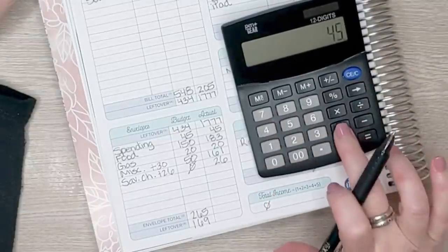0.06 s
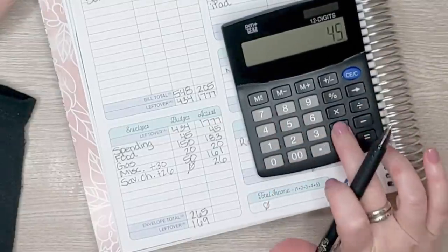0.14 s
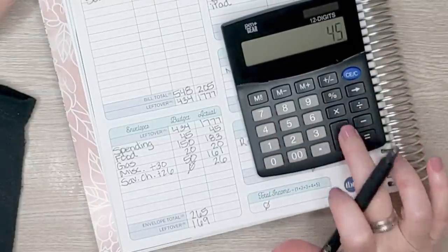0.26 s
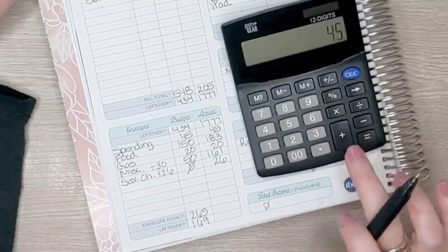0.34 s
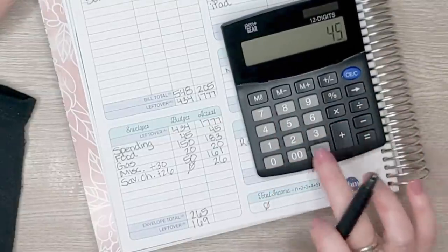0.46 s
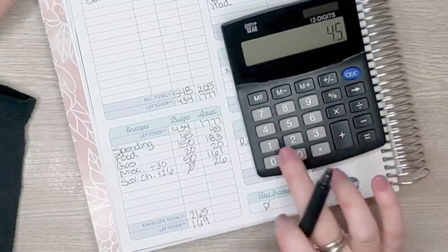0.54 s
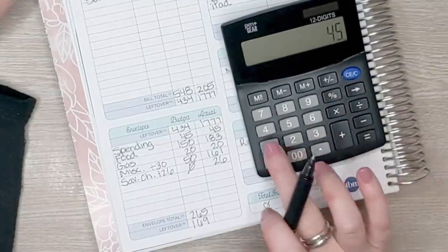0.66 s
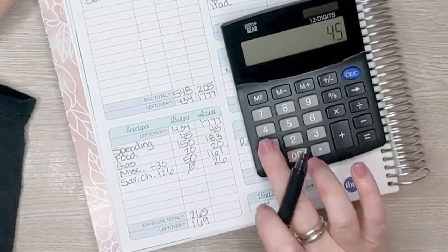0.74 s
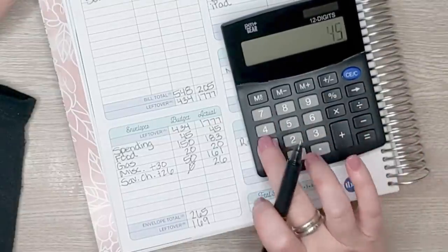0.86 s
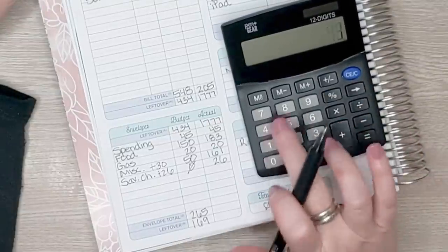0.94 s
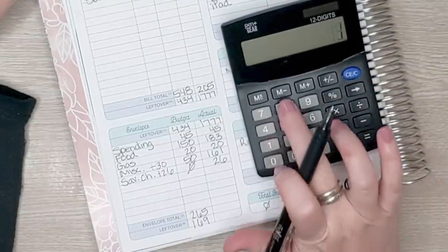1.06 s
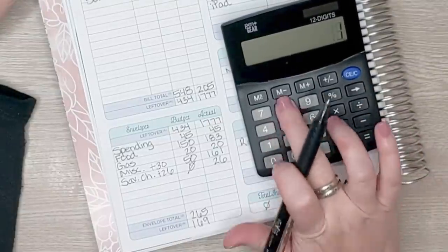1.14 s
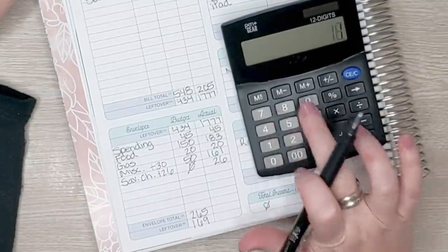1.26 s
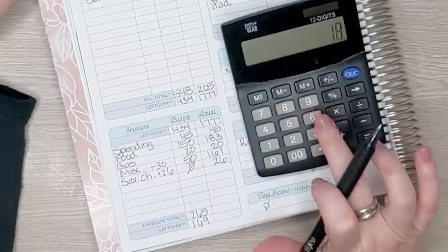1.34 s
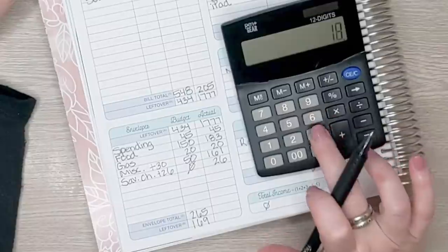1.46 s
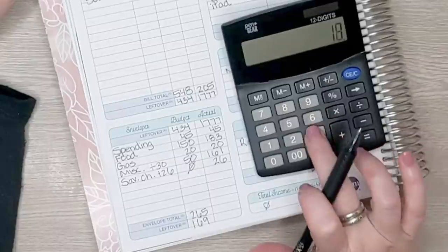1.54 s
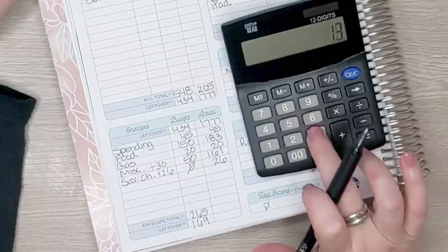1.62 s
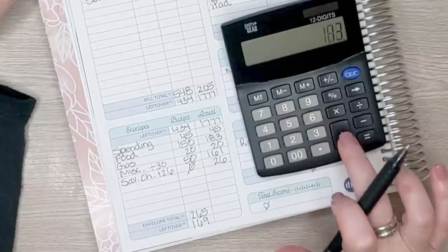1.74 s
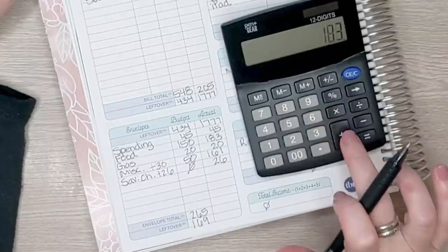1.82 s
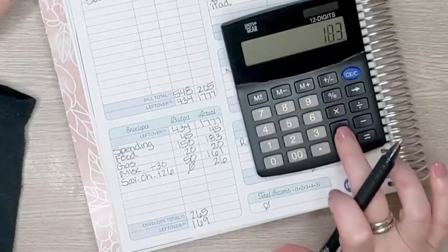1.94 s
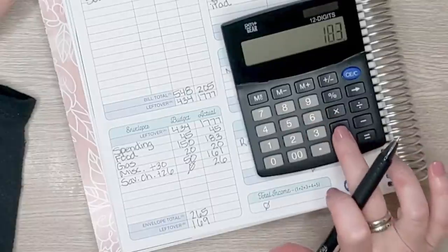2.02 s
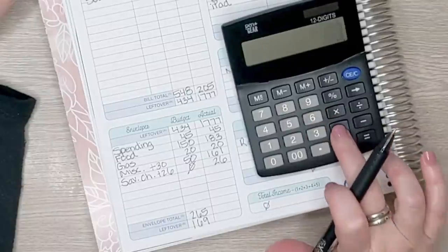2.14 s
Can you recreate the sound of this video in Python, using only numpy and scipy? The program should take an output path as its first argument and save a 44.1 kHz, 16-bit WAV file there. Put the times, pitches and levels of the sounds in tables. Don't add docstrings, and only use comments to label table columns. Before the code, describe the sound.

Calculator key clicks: one sharp loud press, then three softer ones, each with a springy return

```python
import sys
import numpy as np
from scipy import signal
from scipy.fft import rfft, irfft
from scipy.io import wavfile
from scipy.ndimage import uniform_filter1d

SR = 44100
rng = np.random.default_rng(int(sys.argv[2]) if len(sys.argv) > 2 else 0)


def int16_out(signal):
    q = np.round(np.clip(np.atleast_2d(signal).T, -1, 1) * 32767)
    wavfile.write(sys.argv[1], SR, q.astype(np.int16))


def volts_from_decibels(level):
    exponent = np.asarray(level, float) / 20
    return 10 ** exponent


N = 97020

# [f/Hz, level/dB rms]
HUM_LINES = [(56, -64.5), (112, -71.5), (141, -78), (223, -76), (334, -74.5)]
# [f/Hz, density/dB]
RUMBLE_SPECTRUM = [(15, -37), (30, -17), (54, -5), (81, -6.5), (113, -2.5), (162, -11), (300, -30.5),
                   (600, -55)]
# [f/Hz, density/dB]
AIR_SPECTRUM = [(120, -27), (200, -2), (400, -6.5), (700, -9), (1300, -13), (3000, -20), (7000, -24),
                (15700, -35)]
# [f/Hz, density/dB]
AIR_SIDE_SPECTRUM = [(15, -60), (25, 0), (185, -0.5), (463, -5.5), (659, -6.5), (911, -6), (1130, -7.5),
                     (6740, -19), (16000, -28.5)]
# [t/s, level/dB, chatter/s, knock f/Hz, treble/dB]
PRESSES = [(.2172, -42, 0.0051, 1300, -13), (.2196, -20.5, 0.00082, 2900, -15.5),
           (.2203, -24, .0016, 1390, -9.5), (.2218, -22, 0.00036, 870, -7.5), (.2285, -53, .004, 2920, -13),
           (.245, -43, 0.0028, 2070, -17), (.9055, -52, .003, 2900, 0), (.9082, -38.5, .003, 2900, 3.5),
           (.911, -35, .006, 1170, -2), (.9185, -37.5, 0.0029, 444, -25),
           (1.2115, -39.5, 0.006, 2320, -1.5), (1.2192, -27, 0.00034, 1050, -43),
           (1.2305, -53, 0.0015, 870, 5), (1.246, -46.5, 0.016, 5000, 2), (1.6225, -34.5, 0.0027, 1910, 2),
           (1.634, -43.5, 0.005, 2400, -2), (1.6415, -37.5, 0.01, 1150, -13)]
# [t/s, level/dB, chatter/s, knock f/Hz, treble/dB]
RELEASES = [
    (.3478, -45.5, 0.00085, 1447, 19),
    (.3488, -23.5, 0.001945, 1480, -8.5),
    (.352, -37, 0.00169, 1250, 8.5),
    (1.003, -32.5, .010, 1400, 1),
    (1.3045, -45, 0.0043, 1590, 4),
    (1.3102, -35, .005, 1220, 8.5),
    (1.7385, -45, .006, 1500, 3),
    (1.747, -39.5, 0.0021, 1490, 5.5),
    (1.7505, -36.5, 0.0034, 2527, -0.5),
    (1.7515, -39.5, 0.00182, 925, -11),
]
# [f/Hz, level/dB, t60/s]
CASE_MODES = [(602, -9.5, 0.0085), (870, -16.5, 0.03), (1347, -14.5, 0.024), (2070, -2.5, 0.0079),
              (2900, -2, 0.0052), (3360, -10, 0.016), (4760, 0, 0.003), (5970, -9, 0.012),
              (7000, -2.5, 0.002), (8000, -9, 0.0068), (10600, -26, 0.0021), (13000, -40, .002)]
# [f/Hz, level/dB, t60/s]
CAP_MODES = [(918, -10.5, 0.014), (1300, -18, 0.018), (2210, -4, 0.013), (3200, 1, 0.0047),
             (4270, -4.5, 0.0048), (5040, -9.5, 0.012), (5730, -11.5, 0.012), (6530, -6.5, 0.0057),
             (7780, -16.5, 0.0088), (10200, -3, 0.00076), (12400, -19, .002), (13400, -39, 0.0032)]
# [t/s, level/dB, notebook ring/dB, notebook f/Hz]
DESK_THUMPS = [
    (.2215, -45.5, 13.5, 607),
    (.919, -44, 2.5, 476),
    (1.221, -42.5, 3, 834),
    (1.642, -61, -1, 393),
]
# [f/Hz, level/dB, t60/s]
DESK_MODES = [(112.7, -5, 0.34), (80, -3, 0.18), (327, -8.5, 0.042), (420, -1, 0.032)]
# [f/Hz, level/dB, t60/s]
ROOM_BANDS = [(231, -10, 1), (540, -8.5, 0.31), (1080, -11.5, 0.44), (2130, -13, 0.44), (4050, -11.5, 0.33),
              (7640, -14, 0.5), (13000, -11, 0.28)]

HUM_WOBBLE_DB, RUMBLE_DB, AIR_DB, AIR_SIDE_DB = -1, -62, -65, -65.5
CHATTER_PER_S, CHATTER_SPREAD_DB, CHATTER_SWELL_DB = 2900, 5.5, 4
MODE_SCATTER_DB, PORT_SCATTER_DB, TREBLE_FROM_HZ = 3.65, 3, 2840
KNOCK_DB, KNOCK_T60_S = 3.5, 0.0078
CRACK_DB, CRACK_T60_S, CRACK_SOFTNESS = -9, 0.0034, 0.14
BLUR_T60_S, LEFT_LATE_S = 0.0042, .00011
PRESS_LOW_HZ, RELEASE_LOW_HZ = 356, 556
PUSH_S, NOTEBOOK_T60_S = 0.0016, 0.066
ROOM_ONSET_S, EARLY_DB, EARLY_T60_S = 0.0046, -2.5, 0.048
ROOM_DB, TOP_HZ = 7, 15900


def walk(rate):
    hold = int(SR / rate)
    steps = np.repeat(rng.standard_normal(N // hold + 1), hold)
    return 1.26 * uniform_filter1d(uniform_filter1d(steps, hold), hold)[:N]


def hum():
    t = np.arange(N) / SR
    out = np.zeros(N)
    for hz, db in HUM_LINES:
        level = np.sqrt(2) * volts_from_decibels(db + HUM_WOBBLE_DB * walk(9.9))
        cycles = hz * t + np.cumsum(2.314 * walk(8.9)) / SR + rng.random()
        out += level * np.sin(2 * np.pi * cycles)
    return out


def shaped(points, db):
    hz, shape = np.array(points).T
    f = np.maximum(np.arange(N // 2 + 1) * SR / N, 1)
    gain = volts_from_decibels(np.interp(np.log(f), np.log(hz), shape))
    x = irfft(rfft(rng.standard_normal(N)) * gain, N)
    return x * volts_from_decibels(db) / np.std(x)


def quiet():
    shared = hum() + shaped(RUMBLE_SPECTRUM, RUMBLE_DB) + shaped(AIR_SPECTRUM, AIR_DB)
    return shared + shaped(AIR_SIDE_SPECTRUM, AIR_SIDE_DB) * np.array([[1], [-1]])


def ring(hz, t60, size):
    t = np.arange(size) / SR
    return np.exp(-np.log(1000) * t / t60) * np.sin(2 * np.pi * hz * t)


def add(out, sound, s):
    for ch, late in enumerate((LEFT_LATE_S, 0)):
        i = int((s + late) * SR)
        out[ch, i:i + sound.shape[1]] += sound[ch, :N - i]


def chatter(length):
    at = np.cumsum(.2 + 1.6 * rng.random(48)) / CHATTER_PER_S
    at -= at[0]
    level_db = CHATTER_SPREAD_DB * rng.standard_normal(48) + CHATTER_SWELL_DB * at / length
    gate = np.clip((length - at) * CHATTER_PER_S + 1, 0, 1)
    return np.minimum((at * SR).astype(int), 1023), volts_from_decibels(level_db) * gate


def contact_parts(modes, knock_hz, treble_db):
    parts = []
    for hz, mode_db, t60 in modes:
        level_scatter, pitch_scatter = rng.standard_normal(2)
        shelf_db = treble_db / (1 + (TREBLE_FROM_HZ / hz) ** 4)
        mode = ring(hz * (1 + 0.01 * pitch_scatter), t60, 1024)
        parts.append((mode_db + MODE_SCATTER_DB * level_scatter + shelf_db, mode))
    parts.append((KNOCK_DB, ring(knock_hz, KNOCK_T60_S, 1024)))
    grit = signal.lfilter([1], [1, -CRACK_SOFTNESS], rng.standard_normal(1024))
    parts.append((CRACK_DB + treble_db, grit * volts_from_decibels(-60 * np.arange(1024) / SR / CRACK_T60_S)))
    return parts


def keys(table, modes, low_hz):
    out = np.zeros((2, 2, N))
    blur = volts_from_decibels(-60 * np.arange(1024) / SR / BLUR_T60_S)
    for s, db, length, knock_hz, treble_db in table:
        place, weight = chatter(length)
        close, power = np.zeros((2, 2047)), 0
        for part_db, shape in contact_parts(modes, knock_hz, treble_db):
            level, energy = volts_from_decibels(db + part_db), np.sum(shape ** 2)
            spot = np.tanh(2 * rng.standard_normal(48))
            rung = signal.fftconvolve(np.bincount(place, weight * spot, 1024), shape)
            ports = volts_from_decibels(PORT_SCATTER_DB * rng.standard_normal() * np.array([[1], [-1]]))
            close += ports * level * rung * np.sqrt(energy / np.sum(rung ** 2))
            blunt = shape * blur
            power = power + np.abs(level * rfft(blunt)) ** 2 * energy / np.sum(blunt ** 2)
        even = np.roll(irfft(np.sqrt(power)), 64) * np.ones((2, 1))
        add(out[0], close, s)
        add(out[1], even, s + length / 2)
    return signal.sosfilt(signal.butter(3, low_hz, "high", fs=SR, output="sos"), out)


def desk():
    out = np.zeros((2, N))
    push = 1 - np.exp(-np.arange(16384) / SR / PUSH_S)
    for s, db, notebook_db, notebook_hz in DESK_THUMPS:
        modes = [*DESK_MODES, (notebook_hz, notebook_db, NOTEBOOK_T60_S)]
        thump = push * sum(volts_from_decibels(db + mode_db) * ring(hz, t60, 16384) for hz, mode_db, t60 in modes)
        add(out, np.array([thump, thump]), s)
    return out


def room(x):
    t = np.arange(16384) / SR
    f = np.maximum(np.arange(8193) * SR / 16384, 1)
    centres = np.log([row[0] for row in ROOM_BANDS])
    noise = rfft(rng.standard_normal((3, 16384)))
    tail = 0
    for k, (hz, db, t60) in enumerate(ROOM_BANDS):
        band = irfft(noise * np.interp(np.log(f), centres, np.arange(len(ROOM_BANDS)) == k))
        likeness = 1 / (1 + (hz / 670.0) ** 2)
        pair = np.sqrt(likeness) * band[0] + np.sqrt(1 - likeness) * band[1:]
        fall = volts_from_decibels(-60 * t / t60) + volts_from_decibels(EARLY_DB - 60 * t / EARLY_T60_S)
        tail = tail + pair * fall * volts_from_decibels(db) / np.sqrt(SR * t60 / 14)
    tail = tail * np.clip(t / ROOM_ONSET_S, 0, 1) ** 2
    return signal.fftconvolve(tail, x, axes=1)[:, :N]


def scene():
    floor = quiet()
    presses = keys(PRESSES, CASE_MODES, PRESS_LOW_HZ)
    releases = keys(RELEASES, CAP_MODES, RELEASE_LOW_HZ)
    close, spread = presses + releases
    thumps = desk()
    return close + thumps + room(spread + thumps) * volts_from_decibels(ROOM_DB) + floor


def roll_off(x):
    return signal.sosfilt(signal.butter(12, 16460, fs=SR, output="sos"), x)


def record(dry):
    top_cut = signal.ellip(6, .3, 30, TOP_HZ, fs=SR, output="sos")
    mix = signal.sosfilt(top_cut, dry)
    return roll_off(mix)


dry = scene()
out = record(dry)
int16_out(out)
```